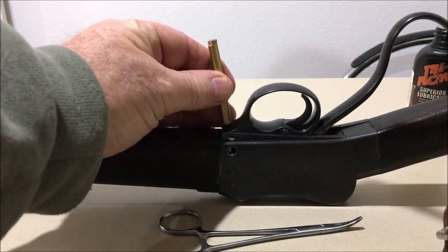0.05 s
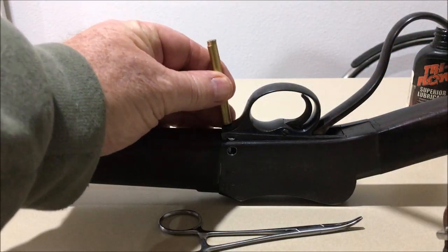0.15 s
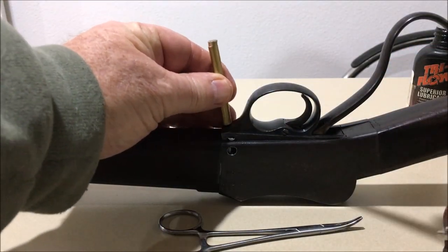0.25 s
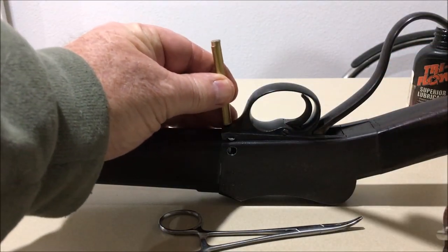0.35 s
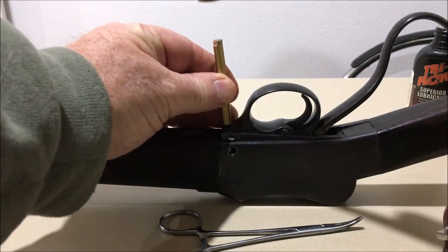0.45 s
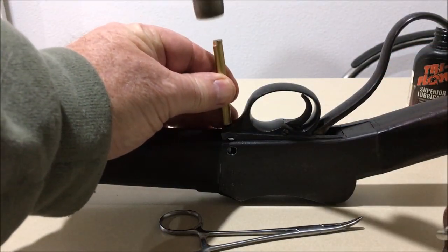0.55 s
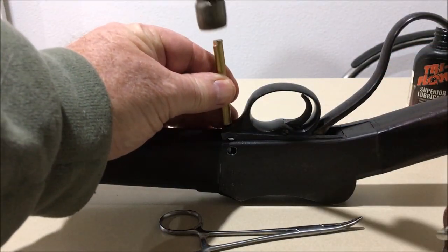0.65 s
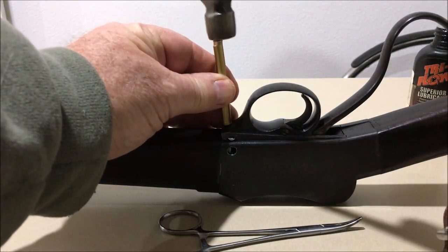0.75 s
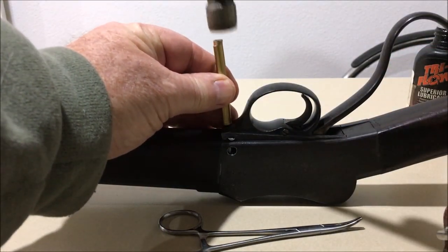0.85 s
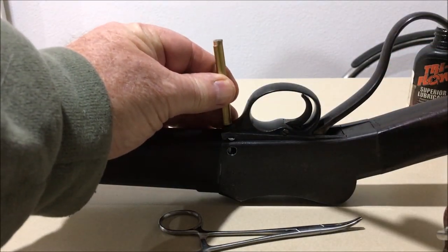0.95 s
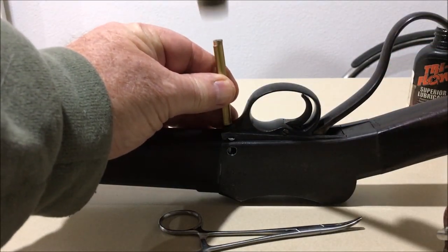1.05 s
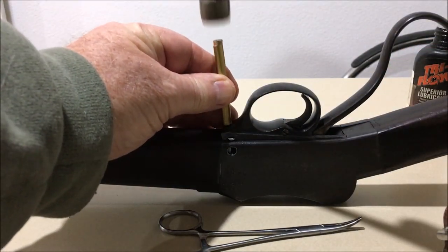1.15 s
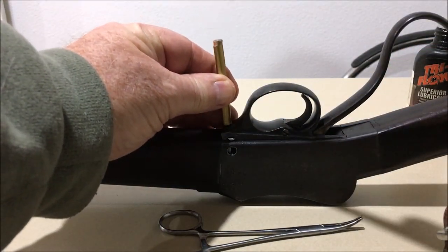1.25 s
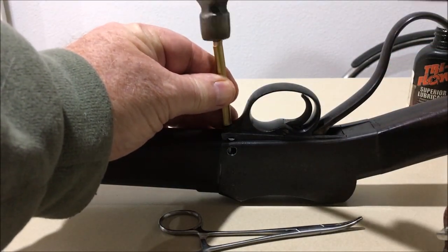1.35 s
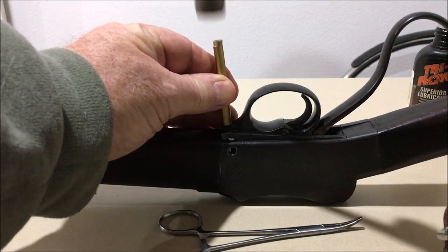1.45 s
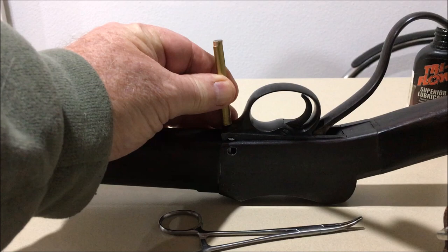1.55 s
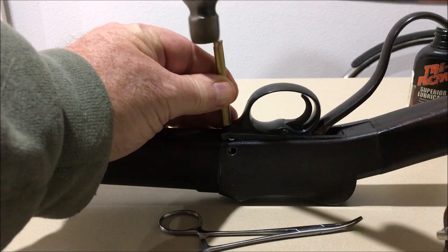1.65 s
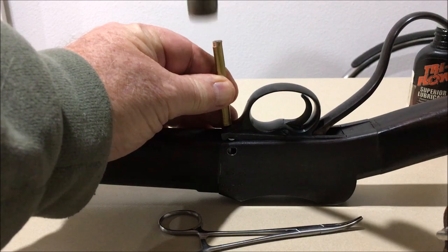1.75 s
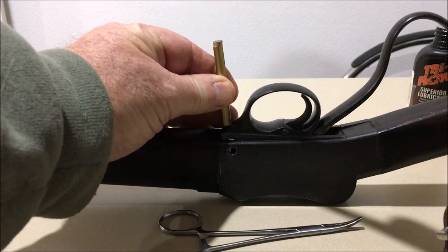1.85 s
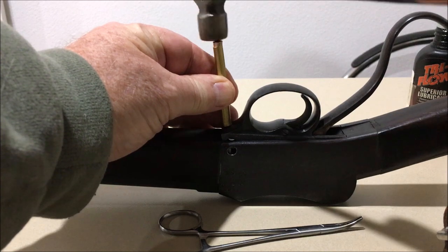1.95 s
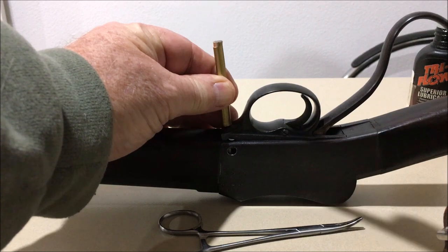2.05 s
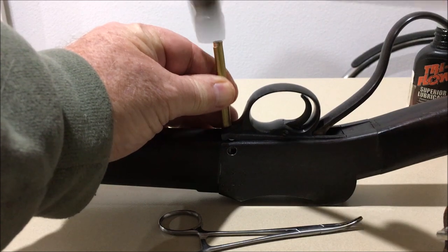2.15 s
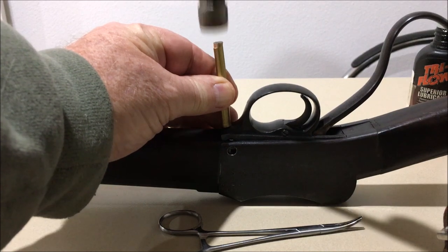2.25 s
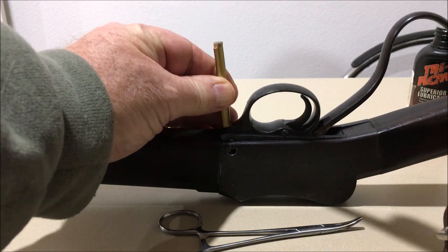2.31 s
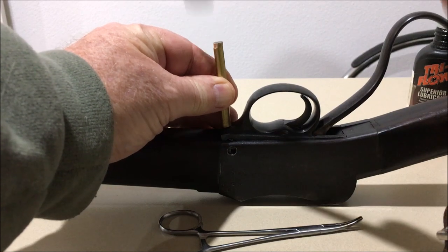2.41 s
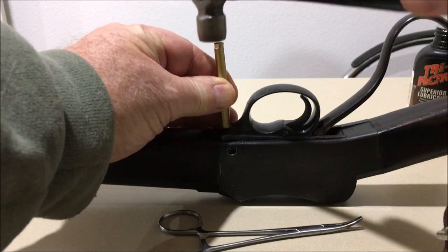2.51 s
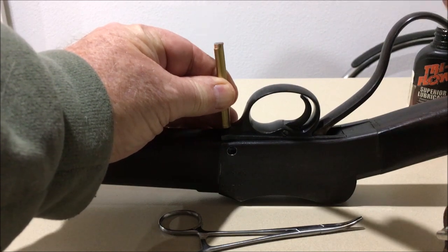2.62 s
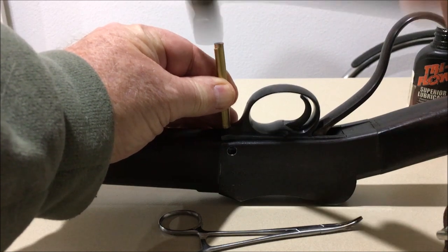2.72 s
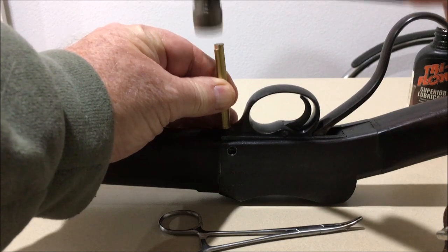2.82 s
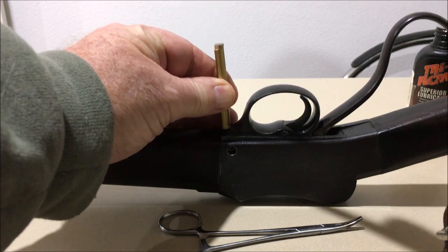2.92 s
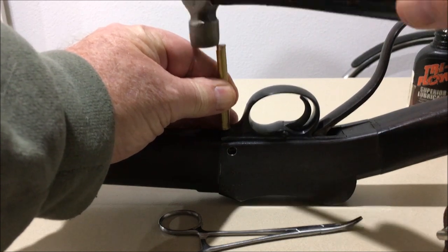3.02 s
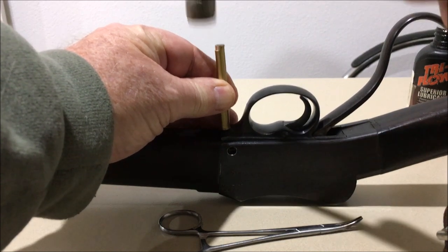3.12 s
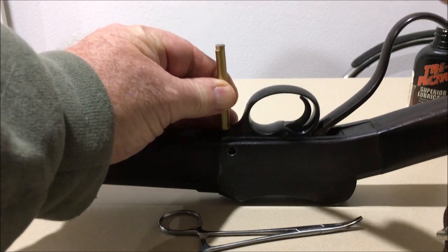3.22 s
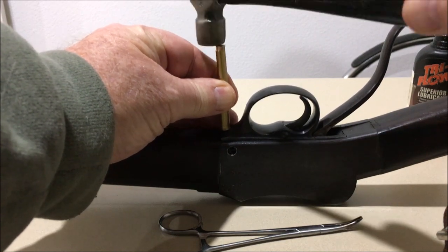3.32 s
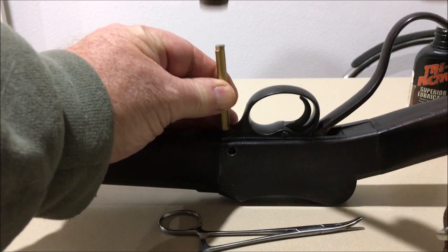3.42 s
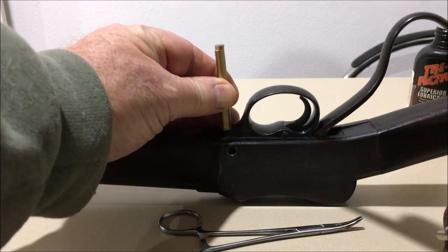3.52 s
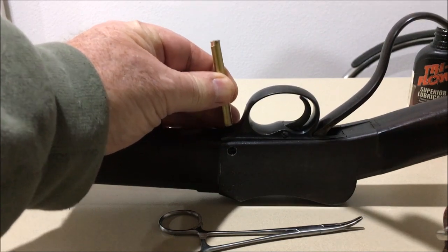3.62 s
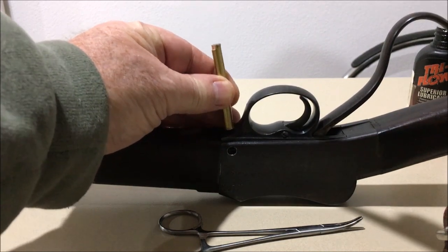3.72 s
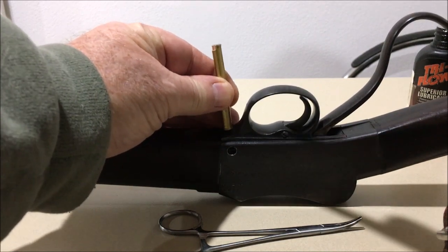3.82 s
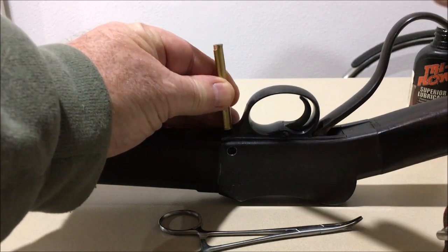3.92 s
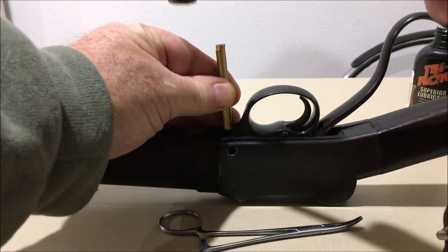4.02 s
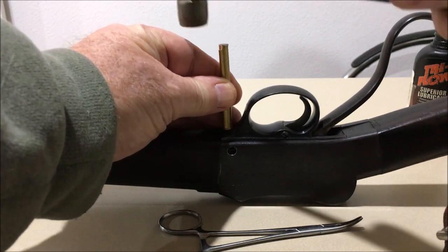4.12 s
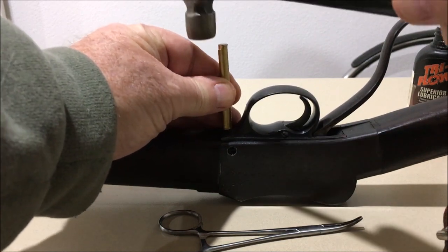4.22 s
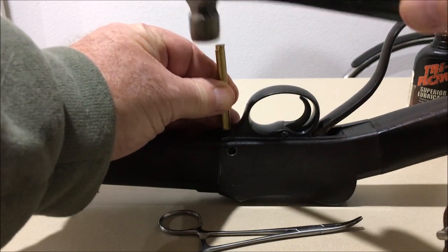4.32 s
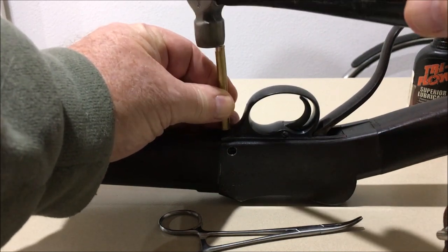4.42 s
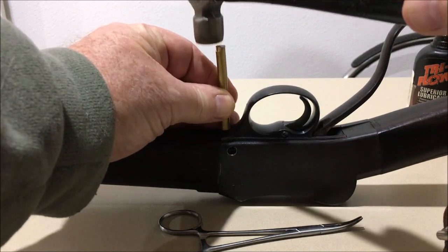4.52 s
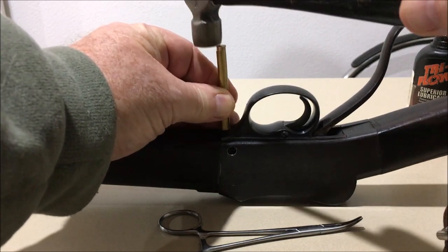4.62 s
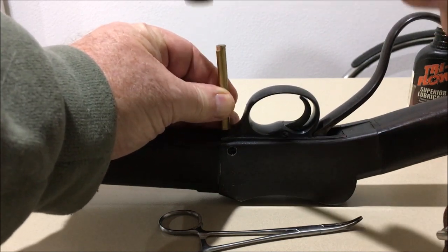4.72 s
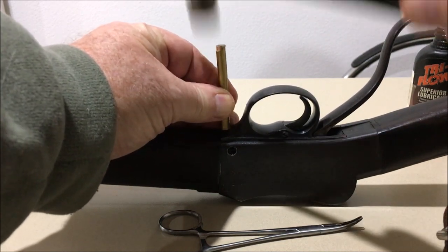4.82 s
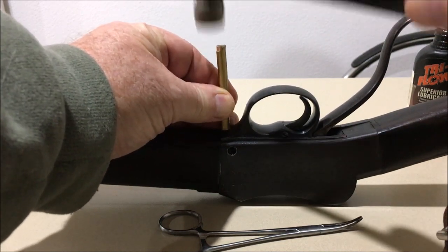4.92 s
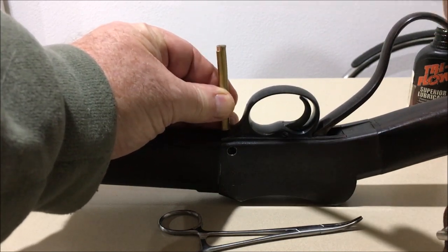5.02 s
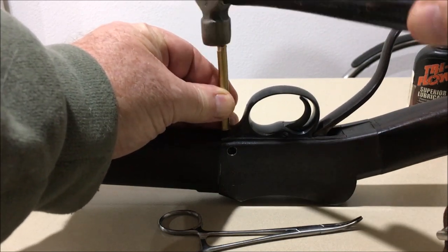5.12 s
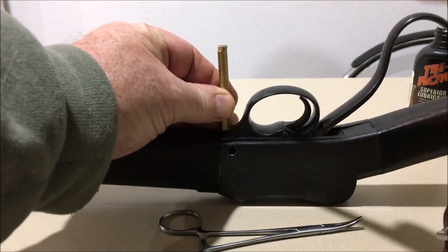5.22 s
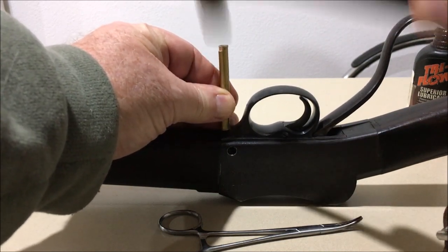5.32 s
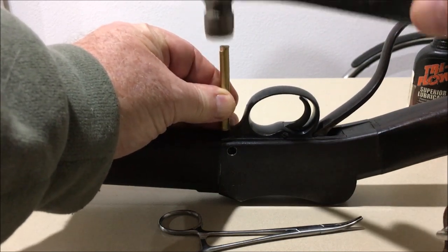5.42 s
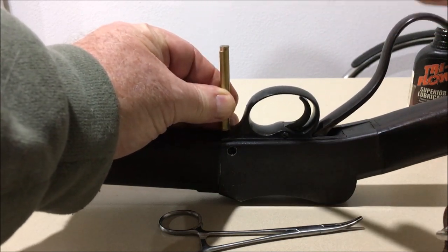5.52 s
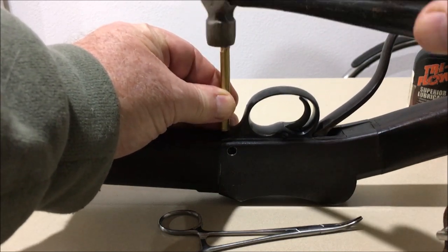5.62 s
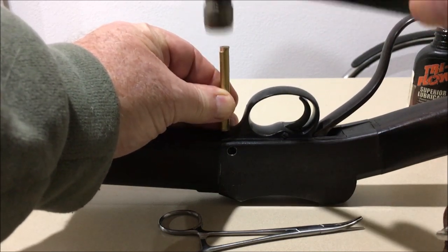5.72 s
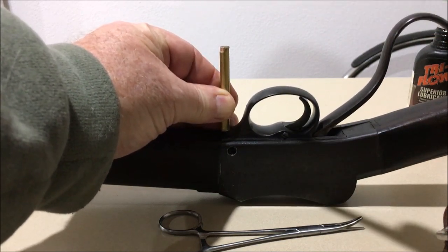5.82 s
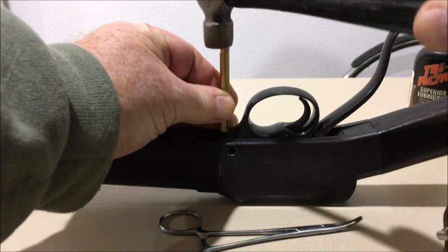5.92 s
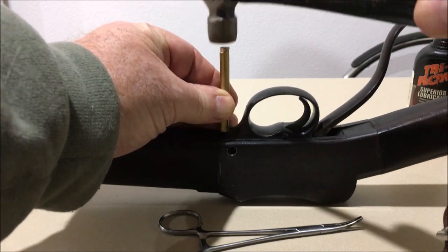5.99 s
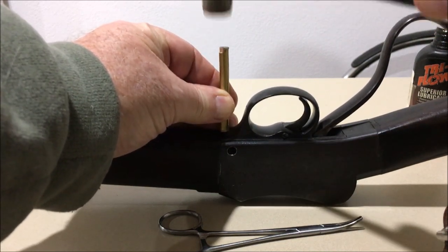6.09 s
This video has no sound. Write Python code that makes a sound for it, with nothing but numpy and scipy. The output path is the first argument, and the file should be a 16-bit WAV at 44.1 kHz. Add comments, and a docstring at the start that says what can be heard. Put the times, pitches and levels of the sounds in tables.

```python
"""In a bare room, a small hammer taps a hand-held brass punch that stands on a pin in a steel part on a table.
Each blow cracks (noise bursts), rings briefly in the metal (fading sines) and, a moment later,
booms in the table top (slower, lower sines). The room rings on as fading noise, over a soft room tone.
The recorder's limiter looks ahead, ducks on each blow and recovers between them."""
import sys
import numpy as np
from scipy import signal
from scipy.io import wavfile
from scipy.ndimage import uniform_filter1d

SR = 44100
rng = np.random.default_rng(int(sys.argv[2]) if len(sys.argv) > 2 else 0)


def persist_wave(psi):
    """Save psi, clipped to +-1, as 16-bit WAV."""
    counts = np.round(np.clip(psi, -1, 1) * 32767).astype(np.int16)
    wavfile.write(sys.argv[1], SR, np.atleast_2d(counts).T)


N = 271215
LEAD_S = 0.7   # time computed before the start, so that an earlier blow can leave its echo


def from_db(db):
    """Turn decibels into a gain."""
    return 10 ** (np.asarray(db) / 20)


def rms_one(x):
    """Scale a sound to an rms of 1."""
    return x / np.sqrt(np.mean(x ** 2) + 1e-20)


def at_hz(table, hz):
    """Read the other columns of a table at one frequency, in between rows on a log axis."""
    at, *columns = np.transpose(table)
    return [np.interp(np.log(hz), np.log(at), column) for column in columns]


def ring(clicks, hz, t60):
    """A resonance: a unit click sets a sine ringing that starts near height 1 and falls 60 dB in t60 seconds."""
    radius = from_db(-60 / (t60 * SR))
    turn = 2 * np.pi * hz / SR
    return signal.lfilter([0, np.sin(turn)], [1, -2 * radius * np.cos(turn), radius ** 2], clicks + 1e-18)


def fade(size, t60):
    """Exponential decay from 1 that falls 60 dB in t60 seconds."""
    return from_db(-60 * np.arange(size) / SR / t60)


def noise_bands(size):
    """Give third-octave bands of noise as (centre Hz, samples); neighbours are unrelated."""
    edges = 25 * 2 ** (np.arange(30) / 3)
    white = rng.standard_normal((2, size))
    for k, (low, high) in enumerate(zip(edges, edges[1:])):
        band_pass = signal.butter(2, [low, high], "band", fs=SR, output="sos")
        yield np.sqrt(low * high), signal.sosfilt(band_pass, white[k % 2])


def contacts():
    """List every contact as (t/s, metal/dB, thud/dB, room/dB, jolt/dB, treble lift/dB, pin seat f/Hz)."""
    # hammer blows: t/s, force level/dB, metal against table/dB, treble lift/dB, seat of the pin f/Hz
    blow_rows = [(0.827, -10.5, 4, -29, 2140), (1.2272, -12.5, 3, -23, 2100), (1.467, -0.5, 3, 1, 1622),
                 (1.7735, 1, 3, 2, 1633), (2.0325, 0.5, 1.9, 2, 1640), (2.287, 3, -1.5, 4.5, 1580),
                 (2.5701, 4.5, -1, 2.5, 1590), (2.8563, 4, -1, 3, 1514), (3.1306, 5, -2.5, -1.5, 1410),
                 (3.4096, 4, -1.6, -2, 1402), (4.4707, -9, 4, -30, 2200), (4.6707, -11, 1.5, -10, 2240),
                 (4.9662, 4, 2, -3, 1487), (5.2042, 4.5, -1, 0, 1395), (5.461, 4.5, -1.8, -0.1, 1460),
                 (5.7354, 3.5, -0.8, 2, 1490), (6.011, 3, -2, 3, 1413)]
    # one blow before the start, same columns; only its echo is left
    earlier_blow = (-.62, 8, 0, 0, 1500)
    # light ticks of metal on metal, mostly the punch bouncing after a soft blow: t/s, level/dB
    tick_rows = [(0.8448, -26), (3.8607, -33.5), (4.4831, -19), (4.6826, -17.5)]
    # the hand or the part nudges the table: t/s, level/dB
    nudge_rows = [(.426, -53), (4.404, -44.5)]
    jolt_db, jolt_growth = -22.5, 0.66   # the jolt grows more than in step with force
    no_jolt_db = -120
    rows = []
    for s, db, metal_db, treble_db, seat_hz in [earlier_blow, *blow_rows]:
        rows.append((s, db + metal_db, db, db - 4, jolt_db + db * (1 + jolt_growth), treble_db, seat_hz))
    for s, db in tick_rows:
        rows.append((s, db, db - 11.5, db - 14.5, no_jolt_db, -8.5, 2600))
    for s, db in nudge_rows:
        rows.append((s, db - 4, db, db - 10, no_jolt_db, -25, 1200))
    return rows


def metal_parts(click, seat_hz, treble_db):
    """A blow rings punch, hammer, part and pin while their faces jar; returns (close sound, sound to the room)."""
    # ringing of punch, hammer and steel part: f/Hz, level/dB, t60/s
    metal_modes = [(1175, -26, 0.18), (2051, -21.5, 0.051), (2803, -3.5, 0.0063), (3297, -6, 0.015),
                   (3927, -32.5, 0.018), (3950, -14, 0.052), (5924, -11, 0.019), (7900, -36, 0.028),
                   (9500, -15.5, 0.0074), (9420, -9.5, 0.025), (9800, -25.5, 0.012), (13540, 5.5, 0.0037),
                   (15300, -8, .005)]
    size = len(click)
    strength = from_db(rng.normal(0, 2, len(metal_modes)))   # differs from blow to blow
    strength *= -(-1) ** np.arange(len(metal_modes))   # neighbours swing opposite ways
    rings = sum(g * from_db(db) * ring(click, hz, t60) for g, (hz, db, t60) in zip(strength, metal_modes))

    # the seat's pitch tends to drop as the pin goes in; its ring follows half of the treble lift
    seat_click = np.roll(click, round(0.000982 * SR))
    seat = from_db(-1.5 + 0.5 * treble_db) * ring(seat_click, seat_hz, 0.031)

    jar = signal.butter(1, [400, 5000], "band", fs=SR, output="sos")
    face = signal.butter(2, 10000, "high", fs=SR, output="sos")
    # the parts jar against each other
    chatter = signal.sosfilt(jar, rng.standard_normal(size)) * fade(size, 0.033)
    # face on face: a shorter, brighter crack
    chatter += from_db(8) * signal.sosfilt(face, rng.standard_normal(size)) * fade(size, 0.0034)

    rise = np.minimum(np.arange(size) / (0.0006 * SR), 1)   # the contact builds up over 0.6 ms
    metal = rise * (from_db(-5.5) * (rings + seat) + from_db(-3) * chatter)
    spread = from_db(11) * click + from_db(-20) * rings + from_db(-24) * seat + from_db(-19) * chatter

    # a harder blow has a shorter contact and so more treble; the lift comes with each contact
    top = signal.butter(1, 4000, "high", fs=SR, output="sos")
    lift = from_db(treble_db) - 1
    return metal + lift * signal.sosfilt(top, metal), spread + lift * signal.sosfilt(top, spread)


def table_top(click):
    """A soft, late push sets the table top's modes ringing; returns (one sound per mode, growth per dB)."""
    # modes of the table top: f/Hz, level/dB, t60/s, direction of first swing (+1 or -1)
    table_modes = [(117.1, -15, .18, -1), (133.2, -24, .43, -1), (139.5, -10, .22, 1), (171.7, -14, .23, 1),
                   (176.7, -20, .52, 1), (194.3, -11, .3, 1), (200, -14, .04, -1), (204.4, -10, .25, 1),
                   (219, -8, .21, 1), (230.4, -25, .6, -1), (241.9, -23, .55, 1), (246, -14, .21, -1),
                   (261.5, -16, .33, -1), (317, -24, .04, 1), (366, -26, .3, 1), (62, -16, .1, 1),
                   (335, -26, .15, -1), (400, -22, .12, -1), (465, -18, .14, 1), (510, -18, .12, -1),
                   (646, -16, .12, 1), (830, -14, .05, -1)]
    late_click = np.roll(click, round(0.0017 * SR))   # the thud lags the crack by 1.7 ms
    push = signal.lfilter(*signal.butter(2, (100, 300), "band", fs=SR), late_click)
    boom = np.array([way * from_db(db) * ring(push, hz, t60) for hz, db, t60, way in table_modes])
    boom /= np.abs(boom.sum(axis=0)).max()
    # modes above 280 Hz grow less than in step with force
    growth = -0.3 * (np.array(table_modes)[:, 0] > 280)
    return boom, growth


def table_frame(click):
    """The table frame lurches: one low, short ring."""
    return ring(click, 72, 0.06)


def blows():
    """Add up crack, metal ring, table boom and jolt of every contact, dry and as sent to the room."""
    size = SR // 2
    click = np.eye(1, size)[0]
    boom, growth = table_top(click)
    jolt = table_frame(click)
    dry, sent = np.zeros((2, N + 2 * SR))
    for s, metal_db, thud_db, send_db, jolt_db, treble_db, seat_hz in contacts():
        metal, spread = metal_parts(click, seat_hz, treble_db)
        grip_db = rng.normal(0, 1, len(boom))   # the grip on the part shifts a little
        thud = from_db(grip_db + growth * np.clip(thud_db, -15, 9)) @ boom
        i = round((s + LEAD_S) * SR)
        dry[i:i + size] += from_db(metal_db) * metal + from_db(thud_db) * thud + from_db(jolt_db) * jolt
        sent[i:i + size] += from_db(send_db) * spread + from_db(thud_db - 17) * thud
    return dry, sent


def room(sent):
    """Walls send sound back: each noise band fades as early reflections plus a late field."""
    # the room's answer: f/Hz, level/dB, t60 of first reflections/s, late share/dB, t60 of the late field/s
    room_bands = [(40, -34, .5, 7.5, 2.1), (102, -33.5, 0.095, -16.5, 1.1), (239, -12.5, .09, -18.5, 0.92),
                  (320, -13, 0.15, -5, 0.78), (494, -12.5, 0.2, -8.5, 0.92), (833.3, -12, 0.15, -16, 1.02),
                  (2430, -19.5, 0.21, -7.5, 1.024), (3250, -29, .17, -11.5, 0.96),
                  (5850, -31, 0.29, -14, 1.18), (9520, -33, 0.14, -12.5, 0.63),
                  (13400, -27.5, .09, -10, 0.44), (17000, -34.5, .08, -7, .3)]
    size = round(1.6 * SR)
    seconds = np.arange(size) / SR
    answer = np.zeros(size)
    for hz, band in noise_bands(size):
        db, early_t60, late_db, late_t60 = at_hz(room_bands, hz)
        build = np.clip((seconds - 0.004) / (0.002 + 10 / hz), 0, 1)   # the bass fills the room slowly
        decay = fade(size, early_t60) + from_db(late_db) * fade(size, late_t60)
        answer += from_db(db) * band * build * decay
    return signal.fftconvolve(sent, answer)[:len(sent)]


def background():
    """Room tone with microphone hiss: steady noise, shaped band by band."""
    # colour of the noise: f/Hz, relative level per Hz/dB
    floor_curve = [(29, -14), (60, 5), (110, -2), (218, 9), (400, -3.5), (997, -3), (3200, -7.5),
                   (4200, -18), (16000, -20)]
    tone = sum(from_db(at_hz(floor_curve, hz)[0]) * band for hz, band in noise_bands(N))
    return from_db(-67.5) * rms_one(tone)


def scene():
    """Blows and their room, cut to start after the lead time, over the background."""
    dry, sent = blows()
    start = round(LEAD_S * SR)
    heard = (dry + room(sent))[start:start + N]
    return (heard + background())[None]


def record(dry, knee_db=-14, squeeze=0.32, release_db_per_s=45, ahead_s=0.0072):
    """Microphone bass cut, look-ahead limiter, rounded peaks, steep top cut."""
    dry = signal.sosfilt(signal.butter(2, 35, "high", fs=SR, output="sos"), dry)
    level_db = 20 * np.log10(np.abs(dry[0]) + 1e-9)
    # follow each peak at once, then let the followed level sink steadily
    slope = release_db_per_s * np.arange(N) / SR
    held_db = np.maximum.accumulate(level_db + slope) - slope
    over_db = np.maximum(held_db - knee_db, 0)
    # look ahead: duck already before the peak arrives
    shift = round(ahead_s * SR)
    coming_db = np.r_[over_db[shift:], np.zeros(shift)]
    over_db = np.maximum(over_db, coming_db)
    gain = from_db(-np.clip(squeeze, 0, 1) * uniform_filter1d(over_db, size=301))
    peaks = 1.011 * np.tanh(from_db(3) * gain * dry / 1.156)
    return signal.sosfilt(signal.cheby2(14, 90, 17100, fs=SR, output="sos"), peaks)


dry = scene()
out = record(dry)
persist_wave(out)
```